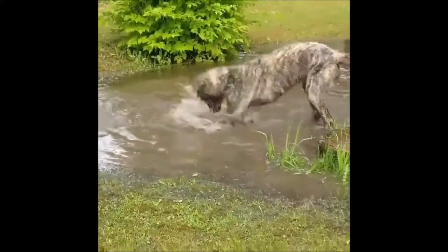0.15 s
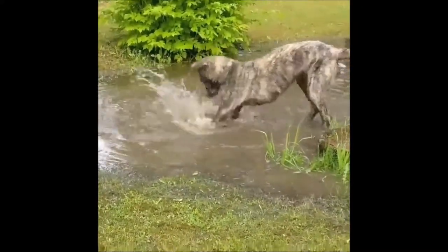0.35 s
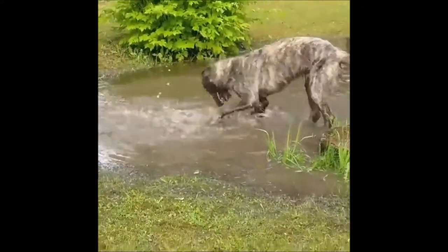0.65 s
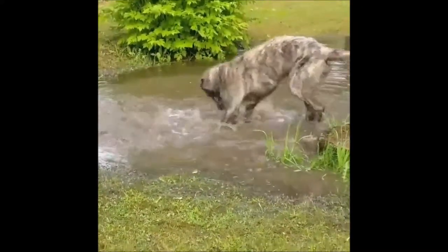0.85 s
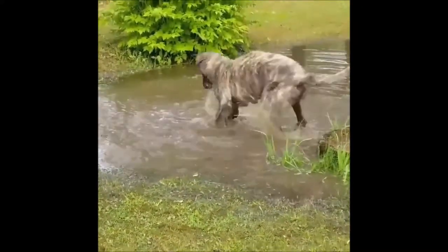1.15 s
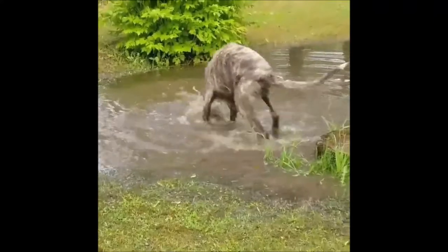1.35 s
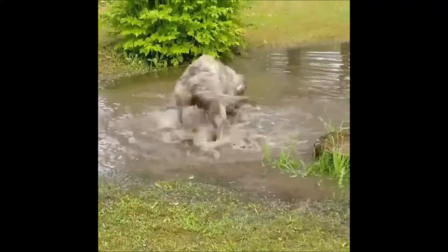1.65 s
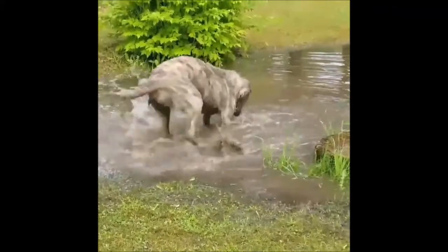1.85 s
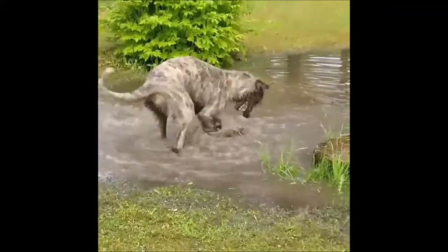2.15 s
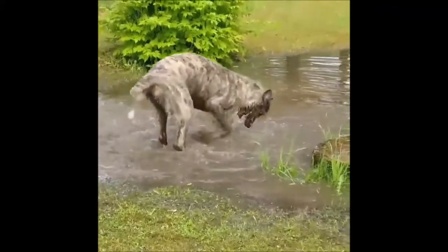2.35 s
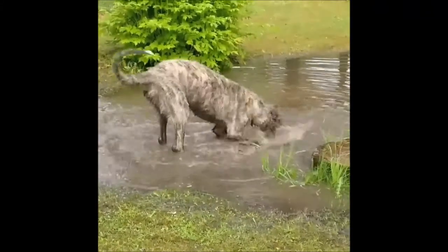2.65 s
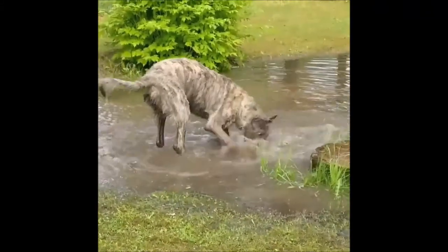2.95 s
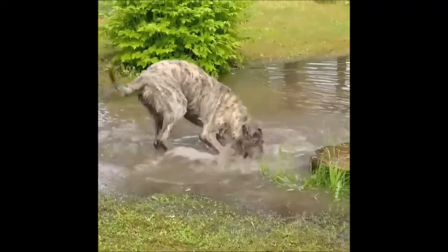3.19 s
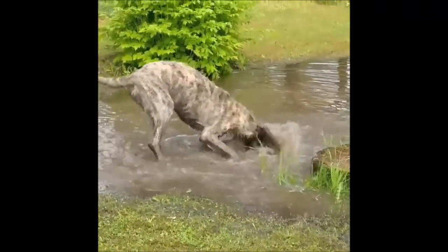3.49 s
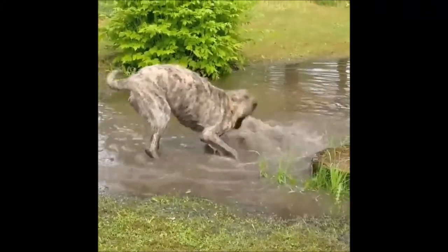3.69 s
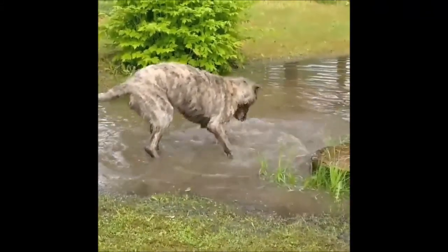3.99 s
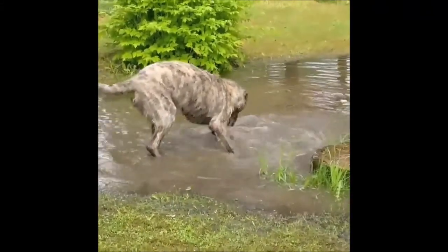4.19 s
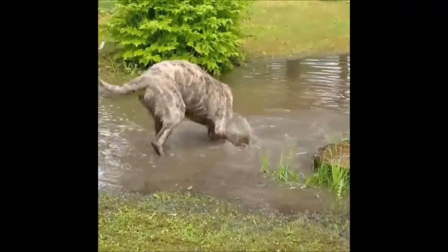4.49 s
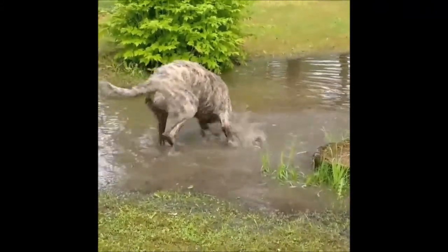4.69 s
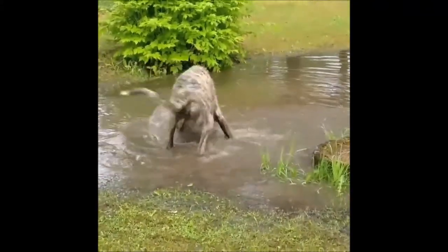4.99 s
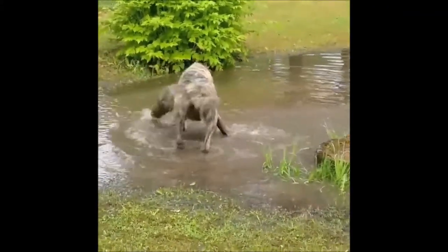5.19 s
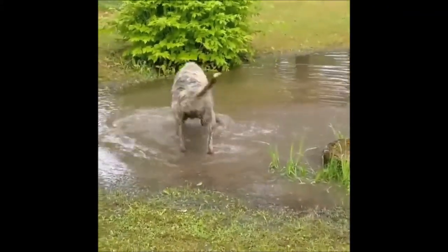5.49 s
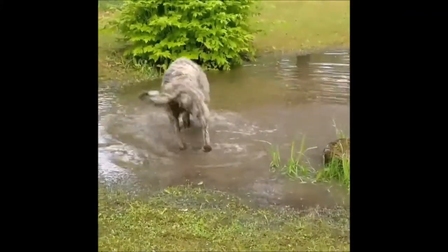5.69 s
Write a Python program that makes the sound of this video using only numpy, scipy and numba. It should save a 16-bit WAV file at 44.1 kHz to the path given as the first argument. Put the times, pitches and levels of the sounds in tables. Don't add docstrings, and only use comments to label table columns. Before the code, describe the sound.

A large dog paws and stamps in a shallow muddy puddle on a lawn, heard from a few metres away. A sharp wet slap and a deep gulp open the sound within 0.2 seconds, then plunges follow irregularly, with bubbly plops near 0.6 and 0.8. Between 1.0 and 2.0 the water churns thickly, with a hollow gulp at 1.35 and a hard snap of breaking water at 1.9. Smaller splashes, drops and spray continue, bunching around 2.6, 2.9 and 3.3 to 3.6. Activity eases from about 3.7 to 4.1, then plops resume, with a strong slap and gulp at 4.5 and more near 4.8 to 5.3. The last half second thins to small splashes and drips, with a snap at 5.84. Dull mud thuds and a very faint distant drone lie beneath. The phone microphone gives hollow, warbling, noise-reduced treble with little sound above about 14 kHz.

```python
import sys
import numpy as np
from scipy import signal
from scipy.io import wavfile
from scipy.ndimage import uniform_filter1d
from numba import njit

SR = 44100
rng = np.random.default_rng(int(sys.argv[2]) if len(sys.argv) > 2 else 0)


def attenuation_scalar(level_db):
    decades = np.asarray(level_db, float) / 20
    return 10 ** decades


def put_to_file(sound):
    columns = np.atleast_2d(sound).T
    safe = np.clip(columns, -1, 1)
    whole_steps = np.round(safe * 32767)
    wavfile.write(sys.argv[1], SR, whole_steps.astype(np.int16))


N = 257544

# start in seconds, gulping in dB, large bubbles in dB, hold in seconds.
PLUNGES = [(.0, -57.5, -39, 0.014), (0.185, -37.5, -39, 0.026), (0.26, -43, -60, 0.027),
           (0.347, -54, -41, 0.036), (0.632, -44.5, -46, 0.03), (0.74, -39.5, -41, 0.06),
           (0.852, -43.5, -49, 0.0054), (0.924, -60, -43.5, 0.012), (1.059, -42, -43.5, 0.088),
           (1.15, -62, -41, 0.03), (1.312, -45, -41, 0.086), (1.42, -52.5, -42.5, 0.11),
           (1.737, -41, -36, 0.029), (1.845, -44, -43, 0.097), (2.49, -52, -52.5, 0.12),
           (2.63, -55, -45, 0.017), (2.85, -52.5, -49, 0.059), (2.95, -47, -51, 0.14),
           (3.282, -47, -54, 0.013), (3.42, -44, -50.5, 0.099), (3.581, -49.5, -37.5, 0.01),
           (4.144, -57, -46, 0.037), (4.201, -51, -44, 0.096), (4.332, -50, -42.5, 0.058),
           (4.484, -48.5, -49, 0.051), (4.811, -53, -44, 0.032), (4.913, -48.5, -44.5, 0.044),
           (5.026, -43.5, -43, 0.085), (5.277, -42, -53, 0.0072), (5.57, -56, -52, 0.14)]
PLUNGE_RISE_DB_S, PLUNGE_FALL_DB_S = 316, 289
# start in seconds, small bubbles in dB, spray in dB,
# hold in seconds.
THROWS = [(.005, -42.5, -60, 0.089), (0.172, -36.5, -35, 0.02), (0.326, -39.5, -39, 0.033),
          (0.533, -56, -42.5, 0.084), (0.743, -34.5, -46, 0.04), (0.85, -38, -56, 0.013),
          (0.92, -50, -54, 0.017), (1.047, -42.5, -47, 0.26), (1.355, -42, -38, 0.062),
          (1.466, -41.5, -48, 0.14), (1.749, -35, -37.5, 0.051), (1.897, -42, -40, 0.028),
          (2.038, -40.5, -40.5, 0.048), (2.215, -42.5, -45.5, 0.031), (2.395, -42.5, -42, 0.016),
          (2.562, -40, -38.5, 0.029), (2.647, -37.5, -41, 0.033), (2.756, -46.5, -43.5, 0.2),
          (2.913, -38.5, -42, 0.045), (3.112, -46.5, -40.5, 0.15), (3.281, -40.5, -42, 0.04),
          (3.427, -44, -44, 0.021), (3.587, -38, -45, 0.034), (4.534, -48, -44, 0.013),
          (4.66, -56, -58, 0.017), (4.128, -45, -41, 0.011), (4.348, -41.5, -67, 0.029),
          (4.48, -43, -50, 0.1), (4.806, -43, -53, 0.018), (4.931, -41, -37.5, 0.016),
          (5.065, -45, -47, 0.052), (5.284, -50, -45, 0.021), (5.537, -49, -71, 0.029),
          (5.661, -47, -47.5, 0.017)]
THROW_RISE_DB_S, THROW_FALL_DB_S = 384, 286
# pitch in Hz, strength in dB.
BUBBLE_TONE = [(550, -6), (800, 2.5), (1100, -2.5), (1350, -4), (1650, -3.5), (2200, -8), (3100, -5),
               (4200, -6.5)]
LOW_CUT = signal.butter(8, 36, "high", fs=SR, output="sos")


def at_hz(points, hz):
    table_hz, db = np.transpose(points)
    return np.interp(np.log(hz), np.log(table_hz), db)


def rms_one(x):
    return x / np.sqrt(np.mean(x ** 2) + 1e-20)


def band(x, low_hz, high_hz):
    edges = [low_hz, min(high_hz, .45 * SR)]
    return signal.sosfilt(signal.butter(2, edges, "band", fs=SR, output="sos"), x)


def part(x, low_hz, high_hz):
    return rms_one(band(band(x, low_hz, high_hz), low_hz, high_hz))


def drift(rate):
    r = np.exp(-40 * np.pi * rate / SR)
    slow = signal.lfilter([1], [1, -2 * r, r * r], rng.standard_normal(N // 20 + 2002))[2000:]
    return np.interp(np.arange(N) / 20, np.arange(len(slow)), rms_one(slow))


def strokes(s, db, hold_s, rise_db_s, fall_db_s, rest_db):
    late = np.arange(0, N + 64, 64)[:, None] / SR - s
    rising_db = rise_db_s * np.minimum(late, 0)
    falling_db = fall_db_s * np.maximum(late - np.abs(hold_s), 0)
    power = attenuation_scalar(2 * (db + rising_db - falling_db)).sum(axis=1)
    power = np.interp(np.arange(N) / 64, np.arange(len(late)), power)
    return np.sqrt(power + attenuation_scalar(2 * rest_db))


@njit
def rings(start, gain, step, cycles, rise, swell, size):
    out = np.zeros(size)
    for k in range(len(start)):
        turns = 0.0
        for i in range(max(start[k], 0), size):
            turns += step[k] * (1 + rise[k] * turns)
            if turns > cycles[k]:
                break
            age = 10 * turns / cycles[k] / swell
            out[i] += gain[k] * (age * np.exp(1 - age)) ** swell * np.sin(2 * np.pi * turns)
    return out


def swarm(per_s, low_hz, high_hz, cycles, rise, spread_db, clump, tone=None):
    luck, crowd = rng.random((6, N)), drift(clump)
    born = np.flatnonzero(luck[0] < per_s * attenuation_scalar(4.3 * crowd) / SR)
    size, pitch, life, climb, sign = luck[1:, born]
    hz = low_hz * (high_hz / low_hz) ** pitch
    gain = attenuation_scalar(spread_db * np.minimum(-np.log(size + 1e-9), 5.0)) * np.sign(sign - .5)
    if tone:
        gain = gain * attenuation_scalar(at_hz(tone, hz))
    return rms_one(rings(born, gain, hz / SR, cycles * (.5 + life), rise * 2 * climb, 0.86, N))


def puddle_unrest():
    # time in seconds, level in dB.
    unrest = [(0, -43.5), (.13, -40.5), (.45, -42.5), (.66, -39.5), (1.0, -41.5), (1.6, -39), (1.95, -38.5),
              (2.15, -41), (2.35, -41.5), (2.78, -39.5), (3.02, -43), (3.4, -43.5), (3.71, -40.5),
              (4.04, -46), (4.39, -43.5), (5.01, -43.5), (5.5, -44), (5.76, -48.5)]
    s, db = np.transpose(unrest)
    return np.interp(np.arange(N) / SR, s, db)


def swing(unrest_db, share_db, follows):
    mean_db = unrest_db.mean()
    return mean_db + share_db + follows * (unrest_db - mean_db)


def gulps():
    # start in seconds, peak in dB, pitch in Hz, length in cycles.
    pockets = [(0.129, -36, 272, 9.5), (0.183, -21, 284, 8.3), (0.275, -29.5, 261, 15),
               (0.725, -38, 260, 18), (0.77, -35, 266, 11), (1.052, -33.5, 273, 11), (1.236, -41, 148, 6.6),
               (1.348, -24.5, 229, 5.5), (1.433, -30, 285, 5), (1.507, -43, 350, 13), (1.682, -42, 420, 25),
               (1.819, -40, 268, 21), (1.906, -29, 193, 1.9), (2.438, -44, 283, 15), (2.472, -43, 270, 16),
               (2.523, -40.5, 253, 19), (2.581, -35.5, 282, 7.9), (2.621, -37, 345, 16),
               (2.943, -37, 207, 14), (2.958, -44, 292, 11), (3.018, -35.5, 240, 6.7), (3.042, -42, 192, 5),
               (3.06, -44, 316, 13), (3.169, -49, 170, 7.8), (3.271, -40.5, 245, 22), (3.448, -35, 317, 17),
               (3.487, -38.5, 273, 20), (4.095, -40.5, 280, 10.6), (4.499, -28, 310, 7.1),
               (4.817, -35.5, 322, 8.7), (4.851, -35.5, 372, 9.8), (4.894, -39.5, 373, 10),
               (4.999, -42, 380, 13), (5.036, -34.5, 335, 36), (5.283, -50, 195, 3.2),
               (5.535, -44, 318, 10), (5.568, -39, 284, 6.3), (5.601, -42, 280, 25), (5.642, -42, 208, 11)]
    s, db, hz, cycles = np.transpose(pockets)
    start = ((s - .003) * SR).astype(int)
    rise = 0.0095 + 0 * s
    return rings(start, attenuation_scalar(db - 2.0), hz / SR, 0.87 * np.clip(cycles, 2, 30), rise, 2.2, N)


def low_gulping(unrest_db):
    s, db, _, hold_s = np.transpose(PLUNGES)
    rest_db = swing(unrest_db, share_db=-23, follows=3.2)
    gain = strokes(s, db, hold_s, PLUNGE_RISE_DB_S, PLUNGE_FALL_DB_S, rest_db)
    slosh = part(rng.standard_normal(N), 115.5, 396)
    bubbles = swarm(140, 203.3, 396, cycles=13.7, rise=0.011, spread_db=3.5, clump=10.5)
    return gain * attenuation_scalar(-5.5) * (slosh + bubbles)


def large_bubbles(unrest_db, sheet):
    s, _, db, hold_s = np.transpose(PLUNGES)
    gain = strokes(s, db, hold_s, PLUNGE_RISE_DB_S, PLUNGE_FALL_DB_S, unrest_db - 9)
    large = swarm(260, 599.3, 1390, cycles=43.0, rise=0.006, spread_db=2.0, clump=12, tone=BUBBLE_TONE)
    return gain * (attenuation_scalar(-8) * part(sheet, 500, 1400) + attenuation_scalar(-2) * large)


def bursts(s, peak_db, decay_s):
    kicks, r = np.zeros(N), np.exp(-1 / (decay_s * SR))
    kicks[np.minimum((s * SR).astype(int), N - 1)] = attenuation_scalar(peak_db) * np.e * (1 - r)
    return signal.lfilter([1], [1, -2 * r, r * r], kicks + 1e-18) * rng.standard_normal(N)


def pops(rows, cycles, brood_db):
    s, db, hz, crack_db = np.transpose(rows)
    crack = band(bursts(s - .005, db + crack_db - 13.0, 0.0065), 520, 3370)
    is_brood = (np.arange(5) > 0)[:, None]
    late, apart, size = rng.standard_normal((3, 5, len(s))) * is_brood
    s = (s + 0.01 * (np.abs(late) - 0.394 * is_brood)).ravel()
    hz = (hz * 2 ** (0.302 * (apart + np.abs(size) / 2))).ravel()
    db = (db + 2 * size + brood_db * is_brood).ravel()
    cycles = 2.0 * cycles * np.sqrt(hz / 1000)
    start = ((s - .0025) * SR).astype(int)
    return crack + rings(start, attenuation_scalar(db - 13.5), hz / SR, cycles, 0.0029 + 0 * s, 0.84, N)


def bloops():
    # start in seconds, peak in dB, pitch in Hz, crack in dB over the peak.
    large_bursts = [(.014, -23, 790, -7), (.134, -27, 930, 10), (.286, -20, 714, -25), (.34, -20, 990, -5),
                    (.587, -23, 704, -14), (.604, -17, 687, -4.5), (.701, -17.5, 767, -13),
                    (.779, -14, 1055, -5), (.845, -24, 580, -8), (1.24, -30, 480, -5),
                    (1.131, -19, 1060, -24), (1.293, -27, 1160, -2), (1.436, -20.5, 1060, 6.5),
                    (1.775, -32, 835, 10), (2.195, -24, 820, -19), (2.225, -26, 1010, -6),
                    (2.625, -19.5, 854, -3), (3.509, -35, 810, -10), (3.572, -25, 784, -11),
                    (3.851, -24.5, 900, -1), (4.072, -35, 760, -26), (4.255, -24, 1000, 1),
                    (4.327, -20, 1130, -22), (4.358, -16.5, 1060, -28), (4.531, -15, 1124, -18),
                    (4.66, -27, 880, 5.5), (4.93, -19.5, 950, 3), (5.013, -20.5, 690, -13),
                    (5.063, -19.5, 730, -14), (5.077, -19, 560, -2), (5.283, -21.5, 690, -15),
                    (5.648, -22, 685, -0.5)]
    return pops(large_bursts, cycles=12, brood_db=-8.5)


def slaps():
    # start in seconds, peak in dB, pitch in Hz, crack in dB over the peak.
    paw_slaps = [(.061, -7.5, 3000, -18), (.183, -15.5, 1700, 4.5), (.859, -16, 1770, 0.5),
                 (.913, -18.5, 1650, 2), (.996, -21.5, 1780, 4.5), (1.039, -20.5, 1580, 1.5),
                 (1.349, -22.5, 1690, 5.5), (1.575, -20.5, 1800, -16), (1.772, -57, 1580, -13),
                 (2.08, -43, 1540, -34), (2.567, -24, 1506, -17), (2.752, -27, 1940, 8),
                 (2.943, -33, 1750, 11), (3.121, -24, 1670, -13), (3.3, -16.5, 2290, -8),
                 (3.389, -23, 1620, -16), (4.1, -22, 1760, 1.5), (4.532, -12.5, 1600, 0.5),
                 (4.544, -31, 1780, -21), (4.771, -18, 1536, -2), (5.626, -20.5, 1660, -4)]
    return pops(paw_slaps, cycles=13.7, brood_db=-14)


def snaps():
    # start in seconds, peak in dB, pitch in Hz, length in cycles, pitch rise per cycle.
    films = [(1.90902, -10, 1750, 1.45, 0), (2.8685, -21, 1500, 1.6, 0), (5.83925, -18, 1600, 3.4, 0),
             (5.554, -34, 720, 16, .03), (5.337, -33, 9000, 6, 0), (5.569, -38, 1250, 30, .05),
             (2.5675, -21, 1600, 6, 0), (2.9415, -23, 1750, 4, 0), (.1855, -15, 1650, 5, 0),
             (.0605, -19, 1900, 3, 0), (.6045, -24, 900, 3, 0), (3.509, -27, 900, 3, 0),
             (4.5435, -25, 1750, 5, 0), (.732, -25, 1300, 4, 0), (4.257, -29, 1100, 3, 0),
             (2.755, -26, 1500, 3, 0), (5.576, -31, 2600, 8, .02), (2.6245, -23, 830, 4, 0),
             (4.0725, -30, 800, 4, 0), (3.301, -26, 2300, 4, 0), (4.7722, -30, 1640, 5, 0)]
    s, db, hz, cycles, rise = np.transpose(films)
    return rings((s * SR).astype(int), attenuation_scalar(db), hz / SR, cycles, rise, 3.8, N)


def water_sheets(patchy_db, shared_db):
    # frequency in Hz, density in dB per Hz.
    wash_spectrum = [(260, -47), (450, -11.5), (744, -3.5), (1670, -2.5), (2460, -16.5), (2680, 26.5),
                     (3140, -1.5), (3890, 1), (4830, -30.5), (5260, -39), (6080, -14.5), (10800, -11),
                     (14000, -4)]
    out, together = 0, drift(14)
    edges = 450 * 2 ** np.arange(0, 5.1, 1 / 3)
    white = rng.standard_normal((2, N))
    for k, (low, high) in enumerate(zip(edges, edges[1:])):
        level_db = at_hz(wash_spectrum, np.sqrt(low * high))
        gain = attenuation_scalar(level_db + shared_db * together + patchy_db * drift(27.0))
        out = out + gain * band(white[k % 2], low, high)
    return out


def small_bubbles(unrest_db, sheet):
    s, db, _, hold_s = np.transpose(THROWS)
    gain = strokes(s, db, hold_s, THROW_RISE_DB_S, THROW_FALL_DB_S, unrest_db - 2.5)
    small = swarm(600, 1385.6, 4460, cycles=83.0, rise=0.00086, spread_db=1.0, clump=12, tone=BUBBLE_TONE)
    patter = swarm(150, 900, 4200, cycles=14, rise=.01, spread_db=2.8, clump=25)
    return gain * (attenuation_scalar(-8) * part(sheet, 1300, 4600) + attenuation_scalar(-3) * small + attenuation_scalar(-8.5) * patter)


def spray_grains(per_s, spread_db):
    luck = rng.random((3, N))
    sizes = attenuation_scalar(spread_db * np.minimum(-np.log(luck[1] + 1e-9), 3.5)) * np.sign(luck[2] - .5)
    return rms_one(band(sizes * (luck[0] < per_s / SR), 10100, 20000))


def spray(unrest_db, sheet):
    s, _, db, hold_s = np.transpose(THROWS)
    rest_db = swing(unrest_db, share_db=-2, follows=1.65)
    gain = strokes(s, db, hold_s, THROW_RISE_DB_S, THROW_FALL_DB_S, rest_db)
    fizz = swarm(1400, 4445, 12790, cycles=210.0, rise=0.001232, spread_db=-5.5, clump=45.0)
    grains = spray_grains(900, 3.9)
    return gain * (attenuation_scalar(-5) * part(sheet, 4120, 12660) + attenuation_scalar(-11.5) * fizz + attenuation_scalar(-9.0) * grains)


def drop_rings(rows, cycles, trim_db):
    s, db, hz = np.transpose(rows)
    start = ((s - .001) * SR).astype(int)
    cycles = cycles * np.sqrt(hz / 1000)
    return rings(start, attenuation_scalar(db + trim_db), hz / SR, cycles, 0.0014 + 0 * s, 1.02, N)


def lone_drops():
    # start in seconds, peak in dB, pitch in Hz.
    small_drops = [(0.3396, -16, 1830), (0.7282, -39, 1400), (0.834, -36, 1660), (0.9602, -24, 1920),
                   (1.1688, -12, 1280), (1.4386, -15, 3370), (1.5354, -21, 3000), (1.6531, -30, 1720),
                   (1.728, -31, 1670), (1.7434, -32, 1780), (2.0437, -22, 1610), (2.236, -20.5, 3000),
                   (2.5082, -18, 1800), (2.5817, -13, 1570), (2.616, -15, 1220), (2.6816, -18, 1740),
                   (2.7924, -25, 1800), (3.3122, -19, 3100), (3.4435, -21, 3900), (3.4514, -15, 1670),
                   (3.5716, -21, 1190), (3.849, -20.5, 1750), (4.4712, -27, 1500), (4.6016, -27, 1640),
                   (4.8745, -21, 1750), (4.9315, -34, 1560), (5.4176, -36, 1650), (5.438, -28, 1650),
                   (5.748, -22, 2700), (5.77, -34, 2630), (5.803, -27, 3500)]
    # start in seconds, peak in dB, pitch in Hz.
    big_drops = [(0.16, -28, 810), (0.179, -15.5, 840), (0.323, -29, 990), (0.688, -31, 790),
                 (0.852, -24, 1150), (0.913, -22, 870), (1.418, -28, 940), (1.851, -30, 950),
                 (1.951, -23.5, 690), (2.606, -39, 820), (2.709, -27.5, 980), (3.273, -30, 860),
                 (4.093, -34, 735), (4.338, -18, 1040), (4.373, -23, 970), (4.384, -24, 1020),
                 (4.645, -31, 875), (4.893, -25.5, 1020), (5.268, -34, 655), (5.299, -36, 790),
                 (5.336, -40, 791)]
    return drop_rings(small_drops, 27, trim_db=-16.5) + drop_rings(big_drops, 17, trim_db=-8.5)


def ticks():
    # start in seconds, peak in dB, lowest frequency in Hz, swell in milliseconds.
    landings = [(.044, -33, 8000, .5), (.0598, -29.5, 4800, 1.4), (.1286, -36, 6000, .5),
                (.182, -25, 4800, 1.5), (.4634, -34, 4800, .4), (.6409, -31, 10000, .6),
                (.572, -34, 9000, .2), (.7607, -23, 7500, 0.34), (.794, -33, 7500, 0.22),
                (.9093, -32, 10000, .7), (0.9368, -28, 6500, 0.36), (1.2126, -37, 10000, .4),
                (1.255, -27, 8000, .4), (1.347, -24, 6000, 1.1), (1.4388, -26, 5500, .5),
                (1.852, -27, 10500, .5), (1.862, -33, 9000, .4), (2.046, -23, 9500, .5),
                (2.0837, -30, 9000, .6), (2.386, -40, 9000, .4), (2.5686, -29, 4500, 0.5),
                (2.7921, -29, 9000, .4), (2.8908, -29, 10000, .4), (2.941, -22, 5000, 1.3),
                (3.099, -33, 8000, .4), (3.1677, -31, 9500, 0.24), (3.275, -31, 9000, .4),
                (3.2994, -34, 6000, 0.33), (3.3538, -30, 8400, .4), (3.3892, -30, 9500, .4),
                (3.4446, -29, 9500, .4), (3.8487, -28, 8000, 0.29), (4.1026, -41, 5000, .4),
                (4.1225, -31, 8000, .4), (4.3061, -27, 8500, 0.28), (4.3187, -24, 8000, 0.21),
                (4.5366, -30.5, 5000, 2.9), (4.6344, -40, 10000, .4), (4.6594, -34, 4800, 0.23),
                (4.6907, -28, 6000, 0.22), (4.7724, -35, 5000, .6), (4.811, -33, 9000, .4),
                (4.8994, -31, 11000, .4), (4.9282, -45, 4500, .8), (5.189, -29.5, 9500, .4),
                (5.3153, -30, 10000, 0.43), (5.5424, -31.5, 10000, .3), (5.547, -32.5, 4470, 1.1),
                (5.6486, -38, 5500, .8)]
    out, length = np.zeros(N), 700
    ms = np.arange(length) / SR * 1000
    for s, db, low_hz, swell_ms in landings:
        age = ms / max(swell_ms, .05)
        click = age * np.exp(1 - age) * rng.standard_normal(length)
        click = band(band(click, low_hz, 18000), low_hz, 18000)
        start = int(s * SR)
        out[start:start + length] += attenuation_scalar(db + 2.5) * click / np.abs(click).max()
    return out


def thuds():
    # start in seconds, level in dB, hold in seconds.
    footfalls = [(0.186, -47, 0.063), (0.776, -59, 0.038), (1.127, -54.5, 0.011), (1.327, -51, .03),
                 (1.445, -51, 0.013), (1.67, -56, 0.013), (1.937, -54, 0.037), (2.673, -58, .015),
                 (2.81, -60, .015), (2.983, -46.5, 0.03), (3.653, -52, 0.016), (4.28, -48, 0.047),
                 (4.35, -52.5, 0.13), (5.104, -55, 0.024), (5.29, -52, 0.0082), (5.656, -56, 0.011),
                 (5.815, -60, .02)]
    gain = strokes(*np.transpose(footfalls), rise_db_s=188, fall_db_s=172, rest_db=-64)
    return gain * part(signal.sosfilt(LOW_CUT, rng.standard_normal(N)), 21.7, 102.6)


def far_field():
    air = part(signal.sosfilt(LOW_CUT, rng.standard_normal(N)), 40, 500)
    drone = part(rng.standard_normal(N), 47.8, 66.3)
    return attenuation_scalar(-67.0) * air + attenuation_scalar(-69.5) * drone


def scene():
    unrest_db = puddle_unrest()
    sheet = water_sheets(patchy_db=1.0, shared_db=-2.0)
    paws = gulps() + low_gulping(unrest_db) + large_bubbles(unrest_db, sheet)
    breaking = bloops() + slaps() + snaps()
    thrown = small_bubbles(unrest_db, sheet) + spray(unrest_db, sheet) + lone_drops() + ticks()
    return (paws + breaking + thrown + thuds() + far_field())[None]


def smooth(x, bins, frames):
    return uniform_filter1d(uniform_filter1d(x, size=bins, axis=0), size=frames, axis=1)


def patches(shape, bins, frames):
    return rms_one(smooth(rng.standard_normal(shape), bins, frames))


def notches_and_dips(x, warble_db, bar_db, keep_db, drop_db):
    # centre in Hz, half width in Hz, depth in dB.
    notches = [(445, 200, 1), (2690, 59.4, -33), (4780, 90, -21), (6090, 49, -15), (4350, 104, -15),
               (1400, 127, -4)]
    # time in seconds, depth in dB,
    # half length in seconds.
    dropouts = [(.213, -32, .007), (.813, -17, .006), (1.004, -20, .006), (1.197, -16, .007),
                (1.654, -48, .014), (1.793, -16, .006), (1.985, -17, .007), (2.412, -19, .006),
                (3.052, -22, .006), (3.222, -20, .006), (3.585, -18, .006), (4.204, -17, .010),
                (5.377, -17, .005), (5.761, -16, .006)]
    hz, s, frames = signal.stft(x, SR, nperseg=1024, noverlap=768)
    hz = hz[:, None]

    def wander(rate):
        return np.interp(s * SR, np.arange(N), drift(rate))

    for notch_hz, width_hz, depth_db in notches:
        centre = notch_hz * (1 + 0.013 * wander(2.5))
        hollow = 1.15 + .9 * np.tanh(2.5 * wander(14) - .9)
        frames = frames * attenuation_scalar(depth_db * hollow * np.exp(-((hz - centre) / width_hz) ** 2))

    warble = patches(frames.shape, 4, 14) * np.clip(hz / 4500, .3, 1)
    frames = frames * attenuation_scalar(warble_db * warble)
    rarity = np.where(hz < 6600, 1.65, np.where(hz < 9300, 1.95, 2.4))
    lost = (hz > 4100) * (patches(frames.shape, 4, 8) > rarity)
    frames = frames * attenuation_scalar(-22 * lost)
    thinned = (hz > 4400) * (hz < 9500) * (patches(frames.shape, 15, 6) > 1.75)
    frames = frames * attenuation_scalar(-11 * thinned)

    narrow = smooth(np.abs(frames) ** 2, 3, 9)
    around = uniform_filter1d(narrow, size=41, axis=0)
    margin = 10 * np.log10(narrow / (around + 1e-20) + 1e-9)
    weak = 1 / (1 + np.exp(np.clip((margin - bar_db) / .7, -30, 30)))
    gated = frames * attenuation_scalar((hz > 2500) * drop_db * weak)
    edge = 13960 + 40 - 260 * (wander(12) > 1)
    gated = gated * attenuation_scalar(-np.clip((hz > edge) * (24 + (hz - edge) / 22), 0, 90))

    bar = np.where(hz > 4200, keep_db - 1.3, keep_db - 4)
    kept = (uniform_filter1d(margin, size=7, axis=0) > bar) | (hz > 12600)
    both = np.stack([gated, gated * kept])
    whole, strongest = signal.istft(both, SR, nperseg=1024, noverlap=768)[1][:, :N]
    t = np.arange(N) / SR
    gap = attenuation_scalar(sum(db * np.exp(-((t - at) / half) ** 4) for at, db, half in dropouts))
    return strongest + gap * (whole - strongest)


def top_cut(x):
    return signal.sosfilt(signal.butter(12, 14450, fs=SR, output="sos"), x)


def record(dry):
    rounded = .3 * np.tanh(dry[0] / .3)
    mix = notches_and_dips(rounded, warble_db=2.7, bar_db=-5.2, keep_db=3, drop_db=-26)
    return top_cut(mix[None])


dry = scene()
out = record(dry)
put_to_file(out)
```